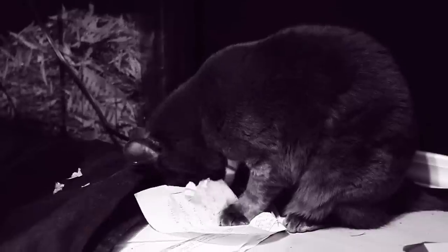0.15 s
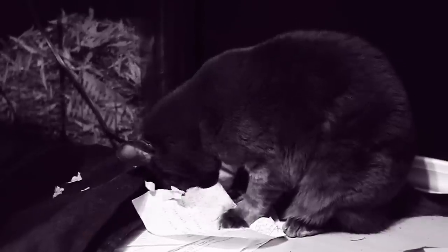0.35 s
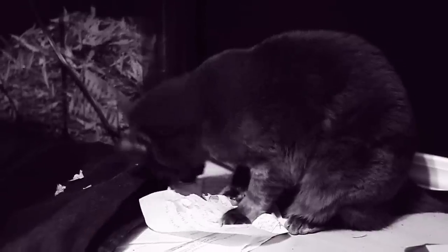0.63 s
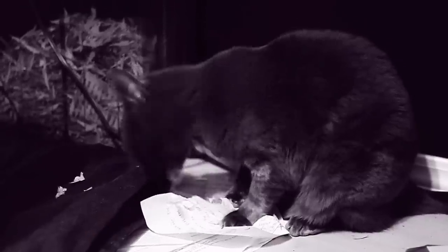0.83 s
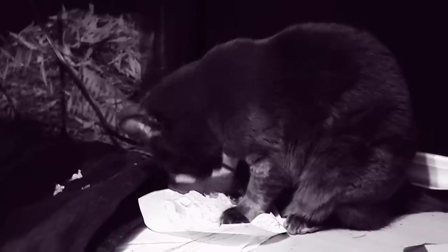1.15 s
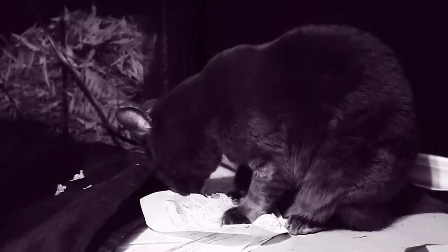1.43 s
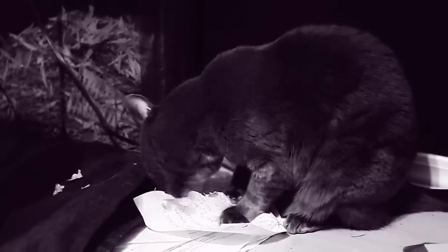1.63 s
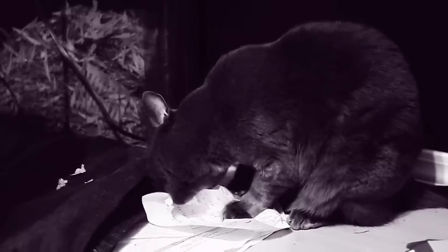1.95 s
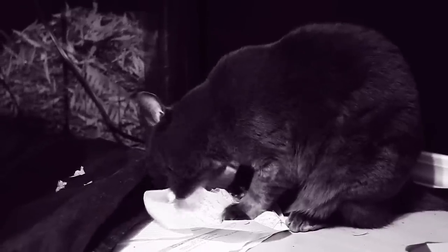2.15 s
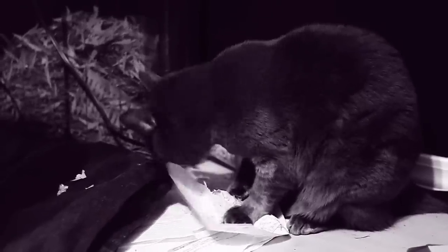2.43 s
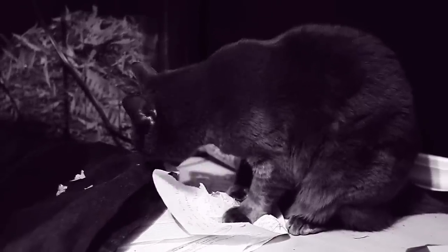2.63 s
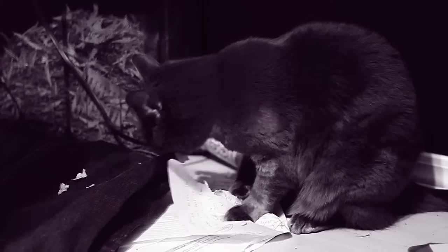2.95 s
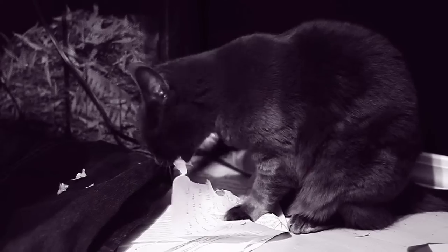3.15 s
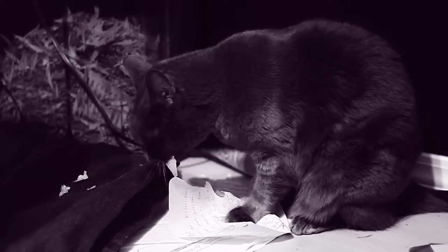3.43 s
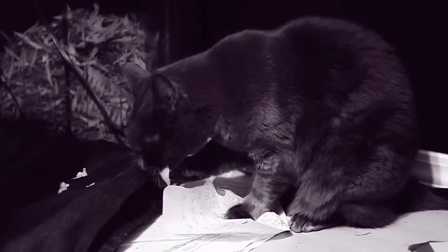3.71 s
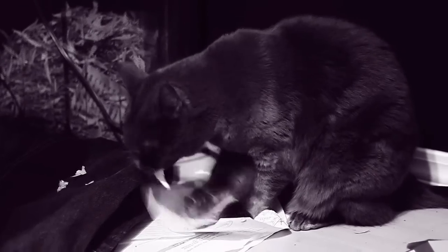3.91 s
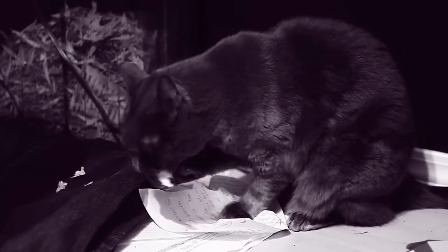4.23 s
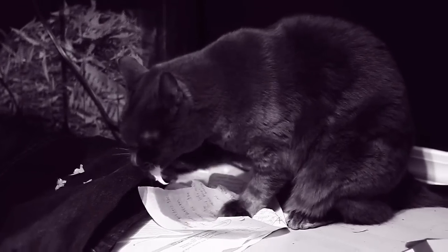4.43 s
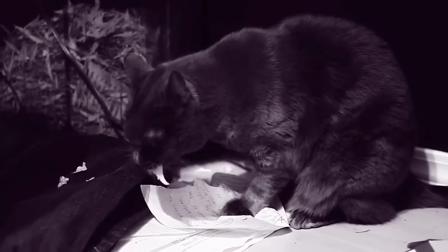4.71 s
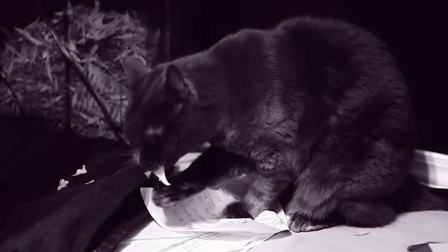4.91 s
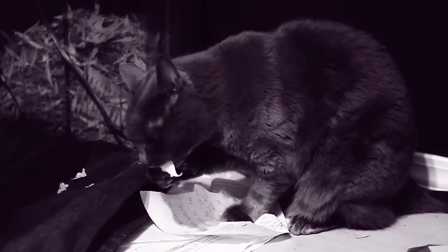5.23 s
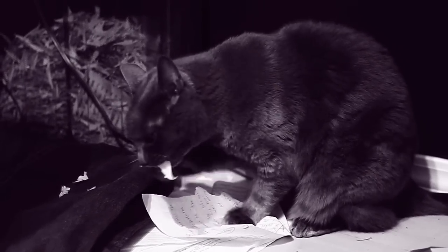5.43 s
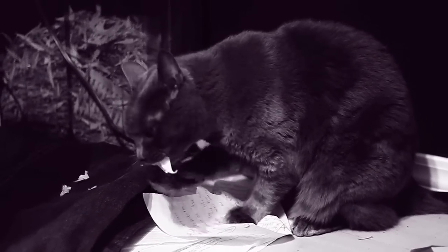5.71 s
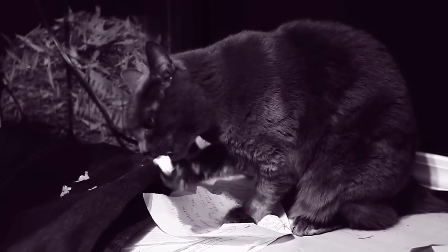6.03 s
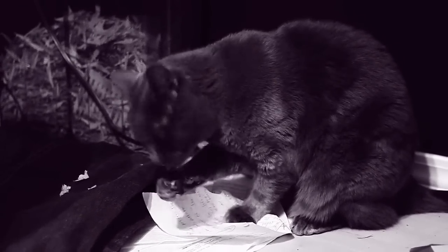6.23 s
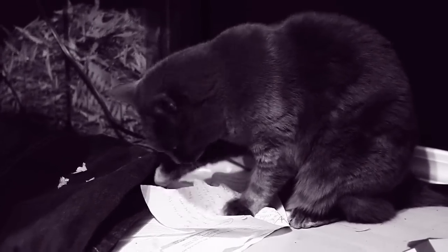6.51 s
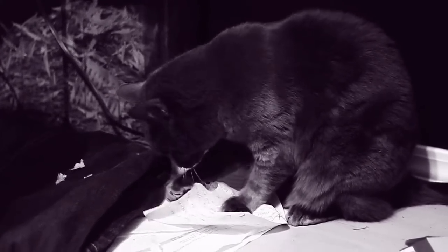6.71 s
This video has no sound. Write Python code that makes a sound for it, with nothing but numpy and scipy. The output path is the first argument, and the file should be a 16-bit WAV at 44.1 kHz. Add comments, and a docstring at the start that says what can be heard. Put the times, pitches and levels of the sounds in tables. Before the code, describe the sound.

Paper tears, crackles and snaps as a cat pulls and bites at it indoors, with faint steady hiss behind.

```python
"""A cat tears a sheet of paper on the floor of a small room, over steady hiss and a throbbing appliance.
From the start, each pull breaks a dense run of fibres, and creases buckle with single snaps.
A few bites follow; from about 2 to 4 s the cat pulls hard again and the sheet thrums as it jerks tight.
Then its teeth crunch softly on a scrap. Near 6.5 s come the last pulls and snaps, and finally
two soft knocks of paws on the floor. The room answers each sound briefly."""
import sys
import numpy as np
from scipy import signal
from scipy.fft import rfft, irfft
from scipy.io import wavfile
from scipy.ndimage import uniform_filter1d

SR = 44100
rng = np.random.default_rng(int(sys.argv[2]) if len(sys.argv) > 2 else 0)


def wav_record(signal):
    """Record a signal, one row per channel, as 16-bit PCM in the file named by sys.argv[1]."""
    frames = np.transpose(np.atleast_2d(signal))
    bounded = np.clip(frames, -1, 1)
    # unit amplitude maps onto the largest positive 16-bit level
    quanta = np.round(bounded * 32767).astype(np.int16)
    wavfile.write(sys.argv[1], SR, quanta)


N = 302526
TIME = np.arange(N) / SR


def undb(db):
    """Turn decibels into a gain to multiply by."""
    return 10 ** (np.asarray(db) / 20)


def unit(x):
    """Scale a sound to an average (rms) level of 1."""
    return x / np.sqrt(np.mean(x ** 2))


def band(x, lo_hz, hi_hz, order=2):
    """Keep the part of a sound between two frequencies."""
    edges = [lo_hz, min(hi_hz, .49 * SR)]
    return signal.sosfilt(signal.butter(order, edges, "band", fs=SR, output="sos"), x)


def ring(x, response):
    """Make every sample of a sound set off the given response."""
    return signal.fftconvolve(x, response)[:len(x)]


def colour(x, points, size=4096):
    """Shape the tone of a sound along a curve of (f/Hz, level/dB) points."""
    hz, db = np.transpose(points)
    grid = np.maximum(np.arange(size // 2 + 1) * SR / size, 1)
    gain = undb(np.interp(np.log(grid), np.log(hz), db))
    # fold the response so that it rings only after a hit, never before
    cepstrum = irfft(np.log(gain))
    cepstrum[1:size // 2] *= 2
    cepstrum[size // 2 + 1:] = 0
    return ring(x, irfft(np.exp(rfft(cepstrum))))


def wander(rate):
    """A smooth random drift of size about 1 that turns `rate` times a second."""
    hold = int(SR / rate)
    steps = np.repeat(rng.standard_normal(N // hold + 1), hold)[:N]
    return unit(uniform_filter1d(steps, hold))


def fade(t, t60):
    """Die away, falling 60 dB every t60 seconds."""
    return np.exp(-np.log(1000) * t / t60)


def struck_tone(t, hz, t60, rise):
    """Something struck rings at one pitch: it swells to a peak of 1, then dies away."""
    envelope = (1 - np.exp(-t / rise)) * fade(t, t60)
    return np.sin(2 * np.pi * hz * t) * envelope / envelope.max()


def add(out, start, sound):
    """Mix a sound in at a start time in seconds."""
    i = max(int(start * SR), 0)
    out[i:i + len(sound)] += sound[:max(len(out) - i, 0)]


def hiss_and_hum(hiss_db=-48.5):
    """The room hisses and an appliance hums; two close tones beat together and make it throb."""
    # tone of the hiss: f/Hz, relative level/dB
    hiss_curve = [(30, -30), (60, -12), (100, -18), (170, -10.5), (330, -9.5), (450, -6), (700, -9.5),
                  (850, -0.5), (1100, -8), (1850, 4), (2300, 2), (3200, -11.5), (5500, -21.5),
                  (16000, -29.5)]
    # tones of the appliance: f/Hz, rms level/dB
    hum_tones = [(92.4, -67), (89.4, -69), (120, -67.5), (193, -78.5), (295, -75), (406, -72), (487, -74),
                 (616, -69.5)]
    hiss = undb(hiss_db) * unit(colour(rng.standard_normal(N), hiss_curve))
    hiss *= undb(0.11 * wander(rate=15))
    hum = sum(undb(db) * np.sqrt(2) * np.sin(2 * np.pi * (hz * TIME + rng.random()))
              for hz, db in hum_tones)
    return hiss + hum


def effort(length, build_db, grip_s=0.0035, size=22050):
    """The strength of one pull: a quick grip, tension that builds or slackens, then letting go."""
    t = TIME[:size]
    grip = np.minimum(t / grip_s, 1)
    tension = undb(build_db * (np.minimum(t / length, 1) - .5))
    release = fade(np.maximum(t - length, 0), t60=0.088)
    return grip * tension * release


def fibres(rate, spread_db, clump_db):
    """About `rate` fibres break a second, mostly small ones, in clumps as the tear sticks and runs."""
    breaks = rng.random(N) < rate / SR
    strength = undb(spread_db * np.minimum(rng.exponential(size=N), 3.5))
    direction = rng.choice([-1, 1], N)
    clumps = undb(clump_db * np.tanh(wander(rate=420)))
    return breaks * strength * direction * clumps


def tearing():
    """Each pull breaks fibres: the sheet flaps, and the torn edge rasps and crackles."""
    # pulls on the sheet: t/s, length/s, level/dB, build-up/dB, flap/dB, rasp/dB, crackle/dB
    # (the last three are relative to the middle band)
    pulls = [(0.0, .12, -50, -8.5, -6, -8, -11.5), (0.193, 0.087, -54.5, 0, -2.5, 1, -3.5),
             (.28, 0.096, -43, 2, -7, -3.5, -10), (0.386, 0.051, -31.5, -0.5, -11, -4, -10.5),
             (0.446, 0.13, -46.5, -7, -13, -0.5, -9), (0.577, 0.021, -28.5, 6.5, -16, -10, -8.5),
             (.612, 0.046, -56, -3, -12, 12, -16), (0.871, 0.02, -48, 2, -25, -4, -7),
             (1.386, 0.074, -52.5, 3, -3, -7, -11.5), (1.763, 0.063, -50, 1, -7, -9, -5.5),
             (1.887, 0.072, -50.5, 4, -2.5, -10, -6), (1.973, .14, -49.5, 7, -11, -3, -10),
             (2.209, 0.082, -45, -10, -9, -2.5, -4.5), (2.299, 0.084, -33, 10, -11.5, -5.5, -5.5),
             (2.396, 0.14, -28.5, 2.5, -14.5, -7, -7), (2.913, 0.018, -28.5, 6, -21, -13, -11.5),
             (2.945, 0.048, -40.5, -2, -11, -4, -5), (3.079, 0.059, -30, -2, -13, -9, -10),
             (3.141, 0.049, -43, 11, -13.5, -17, -8.5), (3.209, 0.06, -32, 8.5, -11, -21, -7.5),
             (3.282, 0.048, -39.5, 3, -12, -12, -4.5), (3.466, 0.064, -50, 4, -9, -11, -7.5),
             (3.563, .07, -46.5, -6, -9, -4.5, -6), (3.653, 0.018, -36.5, -4, -8.5, -6, -12.5),
             (3.708, 0.078, -44.5, -10, -6.5, -7, -7.5), (3.847, 0.028, -31.5, 14.5, -11, -10, -3),
             (3.893, 0.021, -34.5, -6, -17, -1.5, -22), (6.533, 0.028, -40, 4, -14, -9, -11),
             (6.583, 0.053, -41, 4.5, -7.5, -6, -10), (6.654, 0.097, -48.5, -12, -11, -17, -19.5),
             (6.748, 0.13, -46, -2, -10.5, -9.5, -12.5)]
    # tone of the tearing as the microphone hears it, with a ring near 2 kHz: f/Hz, relative level/dB
    heard_curve = [(100, -26.5), (170, -8), (260, -14.5), (440, -3), (620, -8), (1000, -10), (1600, -4.5),
                   (2030, 7), (2550, -8), (3200, -8.5), (4100, -16), (7400, -17.5), (10000, -18.5),
                   (15500, -21.5)]
    gains = np.zeros((4, N))  # one row each for flap, mid, rasp and crackle
    for start, length, db, build_db, flap_db, rasp_db, crackle_db in pulls:
        pull = undb(db) * effort(length, build_db)
        for gain, share in zip(gains, undb([flap_db, 0, rasp_db, crackle_db])):
            add(gain, start, share * pull)
    breaks = colour(fibres(rate=5000, spread_db=3.5, clump_db=3.5), heard_curve)
    flap = unit(band(breaks, 144, 930, order=3))
    mid = unit(band(breaks, 990, 3010, order=3))
    # thicker bundles part less often and give the edge its grit
    bundles = colour(fibres(rate=830, spread_db=1.5, clump_db=3), heard_curve)
    rasp = unit(band(bundles, 2515, 4580, order=3))
    ticks = colour(fibres(rate=97, spread_db=0, clump_db=4), heard_curve)
    edge = unit(breaks) + undb(-4.5) * unit(bundles) + undb(-4) * unit(ticks)
    # the lower and upper treble flicker separately at random
    flicker_db = 2.8
    lower = band(edge, 4400, 7450, order=3) * undb(flicker_db * wander(rate=65))
    upper = band(edge, 9850, 24000, order=3) * undb(flicker_db * wander(rate=90))
    crackle = unit(lower + upper)
    return np.sum(gains * [flap, mid, rasp, crackle], axis=0)


def crack(hz, width, lift_db, spread, size):
    """A bright click, strongest near hz; highs cross the sheet faster, which smears it a little."""
    f = np.maximum(np.arange(size // 2 + 1) * SR / size, 1)
    peak = 1 + undb(lift_db) * np.exp(-(np.log(f / hz) / width) ** 2)
    low_cut = 1 / np.sqrt(1 + (2600 / f) ** 4)
    high_cut = 1 / np.sqrt(1 + (f / (2 * hz)) ** 4)
    smear = np.exp(-2j * np.pi * spread * np.sqrt(f * hz))
    click = irfft(peak * low_cut * high_cut * smear)
    return click / np.abs(click).max()


def snaps(size=2048):
    """A crease flips over with a sharp crack and a low flap; a short ring near 2 kHz sounds with each snap."""
    # buckling creases: t/s, level/dB, ring f/Hz, flap/dB, crack/dB, crack f/Hz, ring time/s
    # (flap and crack are relative to the level)
    creases = [(0.0289, -30, 2200, -20, -16, 4370, .005), (0.1533, -19, 1725, -13, -5, 5240, .0033),
               (0.2966, -12, 2170, -23, -20, 4750, 0.0041), (0.3835, -7.5, 1960, -26, -17.5, 9800, 0.0038),
               (0.3938, -17, 2130, -18, -5.5, 6000, 0.01), (.4332, -17.5, 2130, -34, -11.5, 4670, 0.025),
               (.485, -25.5, 2020, -10, -20, 6350, 0.0069), (0.542, -29, 1960, -9.5, -5, 12500, 0.016),
               (0.602, -6, 2670, -34, -15.5, 7100, 0.0048), (0.8681, -25, 1820, -38, -21, 7300, .004),
               (1.7921, -26.5, 2100, -25, -20, 7660, 0.0036), (2.0426, -14, 2600, -46, -23, 3660, 0.0061),
               (2.141, -11, 1900, -21, -9, 9170, .0032), (2.203, -12, 2030, -41, -10.5, 7350, 0.0061),
               (2.912, -18, 2030, -27, -7.5, 7600, 0.021), (2.973, -21.5, 2100, -17, -8.5, 10900, 0.011),
               (3.0835, -17, 2950, -21, -17, 7200, .0025), (3.2128, -19.5, 1840, -29, -13, 7360, 0.025),
               (3.283, -21, 1720, -33, -5.5, 10860, 0.016), (3.4726, -26, 1980, -27, -15.5, 7130, 0.002),
               (3.561, -32.5, 1910, -22, 3.5, 11000, 0.002),
               (3.6561, -17.5, 2100, -14.5, -18, 4920, 0.0039), (3.712, -26, 2020, -7, -3.5, 14640, .014),
               (3.7572, -28.5, 1910, -26, -1, 14800, .034), (3.83, -22, 1810, -19, -14, 12000, 0.0048),
               (3.879, -13.5, 1990, -17, -9, 7540, .008), (3.8945, -19, 2030, -39, -16, 4660, 0.015),
               (3.8945, -12.5, 3130, -32, -19, 4740, 0.0048), (6.556, -24, 1850, -31, -16, 4700, 0.0028),
               (6.6035, -19.5, 1920, -22, -24, 7500, 0.0033)]
    out, t = np.zeros(N), TIME[:size]
    for start, db, hz, flap_db, crack_db, crack_hz, t60 in creases:
        main_tone = struck_tone(t, hz, t60, rise=0.00016)
        overtone = undb(-21) * struck_tone(t, 1.42 * hz, t60=0.0025, rise=0.00061)
        mid_ring = band(main_tone + overtone, 710, 4000)
        flap = struck_tone(t, hz=456, t60=0.025, rise=0.00093)
        noise = unit(band(rng.standard_normal(size), 2100, 10300, order=1))
        grit = undb(-13.5) * noise * fade(t, t60=0.038)
        edge = crack(crack_hz, width=0.16, lift_db=5, spread=0.0036, size=size) + grit
        add(out, start, undb(db) * (mid_ring + undb(flap_db) * flap + undb(crack_db) * edge))
    return out


def chewing(size=8192):
    """Teeth crush the damp paper in soft, bright crunches, each with a smack of the mouth."""
    # bites: t/s, level/dB, smack relative to crunch/dB
    bites = [(0.783, -42.5, -8), (0.832, -49, -5), (1.167, -56, -3), (4.111, -61, 0), (4.262, -50, -3),
             (4.3, -57, 0), (4.575, -55, 3), (4.719, -53, 0), (5.125, -56, 0), (5.199, -47.5, 13),
             (5.29, -51, 0), (5.785, -53, 3), (5.92, -59, 0), (5.96, -51.5, 0), (6.078, -55, 0),
             (6.259, -51.5, 0)]
    out, t = np.zeros(N), TIME[:size]
    envelope = np.minimum(t / .012, 1) * fade(t, t60=0.092)
    for start, db, smack_db in bites:
        grit = rng.standard_normal(size) * rng.exponential(size=size)
        crunch = unit(band(grit, 4000, 15700))
        smack = undb(smack_db) * unit(band(grit, 1750, 1787))
        add(out, start - .004, undb(db) * (crunch + smack) * envelope)
    return out


def tugs(size=8192):
    """The whole sheet thrums briefly when it jerks tight between teeth and paws."""
    # jerks of the sheet: t/s, level/dB
    jerks = [(2.441, -44), (2.926, -50), (2.964, -40), (3.092, -41), (3.124, -40), (3.249, -44),
             (3.716, -48), (3.868, -36), (6.628, -54)]
    out, t = np.zeros(N), TIME[:size]
    thrum = (struck_tone(t, hz=333, t60=0.057, rise=0.0012)
             + 0.5 * struck_tone(t, hz=221, t60=0.095, rise=0.0043)
             + 0.28 * struck_tone(t, hz=151, t60=0.077, rise=0.0043))
    for start, db in jerks:
        add(out, start, undb(db) * thrum)
    return out


def paws(size=4096):
    """A paw meets the floor: a soft knock with a dull thud under it."""
    # knocks on the floor: t/s, level/dB
    steps = [(6.822, -29.5), (6.842, -52)]
    out, t = np.zeros(N), TIME[:size]
    knock = (struck_tone(t, hz=880, t60=0.013, rise=0.0004)
             + struck_tone(t, hz=255, t60=0.0077, rise=0.00023))
    thud = struck_tone(t, hz=90, t60=0.046, rise=0.002)
    for start, db in steps:
        add(out, start, undb(db) * (1.05 * knock + 0.05 * thud))
    return out


def room(x, tail_db, t60_low, t60_mid, t60_high, size=22050):
    """Sound arrives directly, then as a few close echoes and a short, blurred tail."""
    # echoes from nearby surfaces: delay/s, level/dB
    echoes = [(.0027, -20), (.0068, -16), (.0087, -25), (0.0118, -12)]
    t, noise = TIME[:size], rng.standard_normal(size)
    tail = (undb(1) * band(noise, 72, 530) * fade(t, t60_low)
            + band(noise, 850, 2290) * fade(t, t60_mid)
            + band(noise, 4050, 25500) * fade(t, t60_high))
    tail *= np.clip((t - .002) / 0.0059, 0, 1)  # the tail takes a moment to build
    response = undb(tail_db) * tail / np.linalg.norm(tail)
    response[0] += 1  # the direct sound
    for delay, db in echoes:
        add(response, delay, undb([db]))
    return ring(x, response)


def scene():
    """Snaps and knocks fill the room; tearing, tugs and chewing are heard more directly."""
    sharp = room(snaps() + paws(), tail_db=-1.66, t60_low=0.18, t60_mid=0.21, t60_high=0.21)
    soft = room(tearing() + tugs() + chewing(), tail_db=-4.5, t60_low=0.18, t60_mid=0.23, t60_high=0.23)
    return (sharp + soft + hiss_and_hum())[None]


def record(dry, bottom_hz=55, top_hz=16200):
    """The microphone's opening lifts or dips a few treble bands; deep bass and the very top are cut."""
    # narrow resonances of the opening: f/Hz, width/Hz, gain/dB
    resonances = [(7220, 440, 3), (10970, 410, 5), (14300, 390, -1.5)]
    shaped = dry + sum((undb(db) - 1) * band(dry, hz - width / 2, hz + width / 2, order=1)
                       for hz, width, db in resonances)
    thin = signal.sosfilt(signal.butter(2, bottom_hz, "high", fs=SR, output="sos"), shaped)
    return signal.sosfilt(signal.ellip(10, .2, 70, top_hz, fs=SR, output="sos"), thin)


dry = scene()
out = record(dry)
wav_record(out)
```